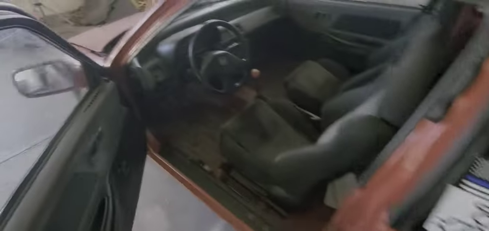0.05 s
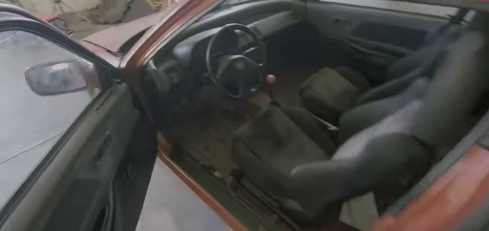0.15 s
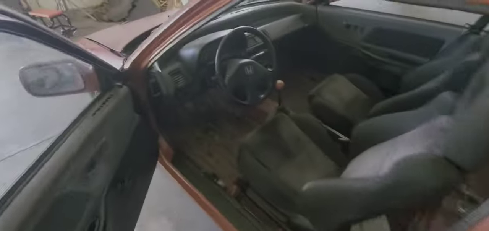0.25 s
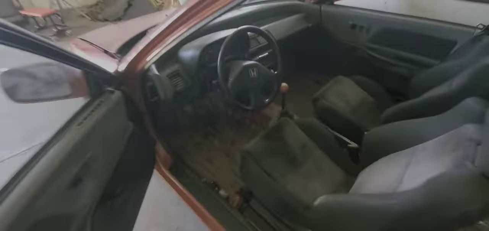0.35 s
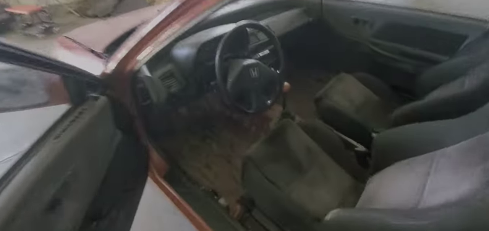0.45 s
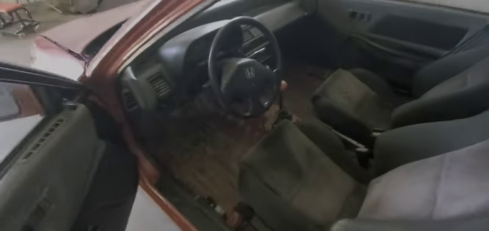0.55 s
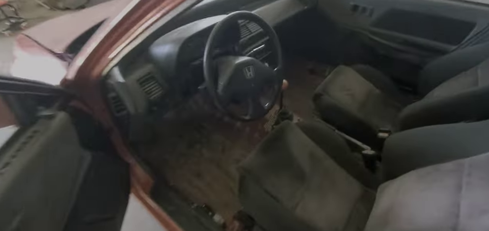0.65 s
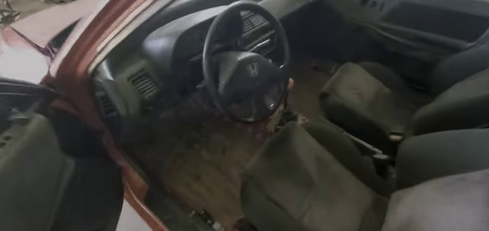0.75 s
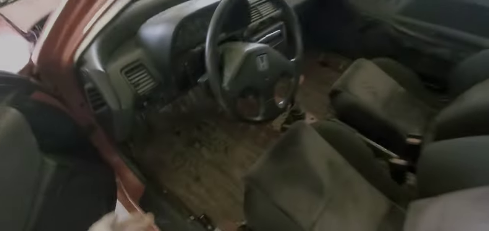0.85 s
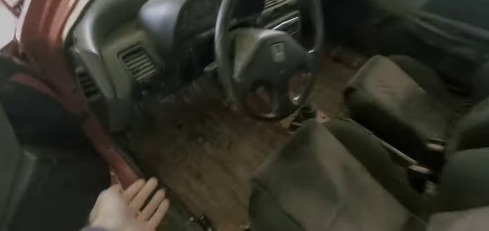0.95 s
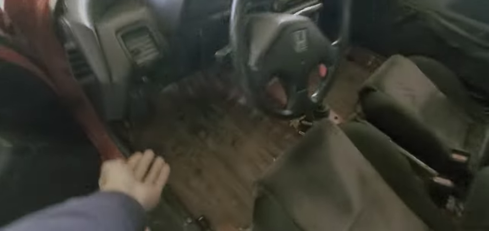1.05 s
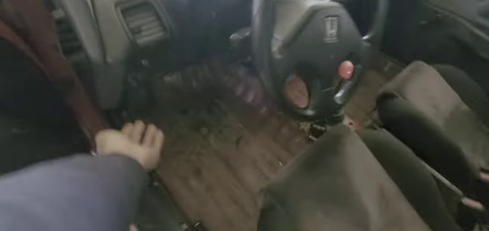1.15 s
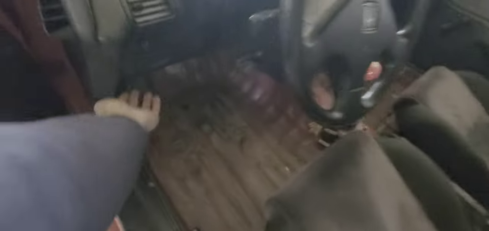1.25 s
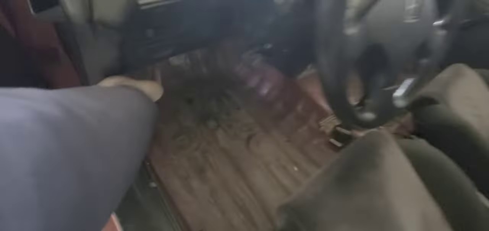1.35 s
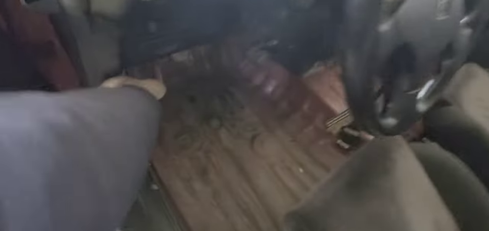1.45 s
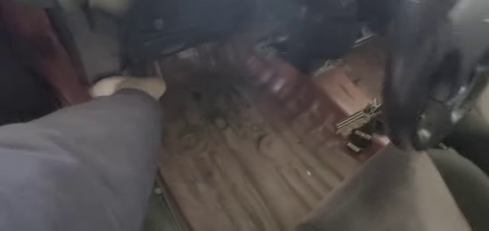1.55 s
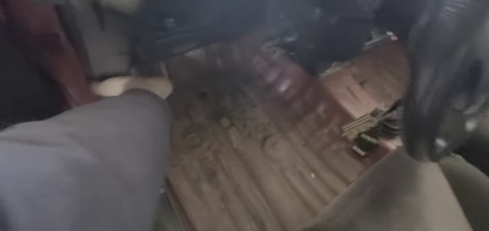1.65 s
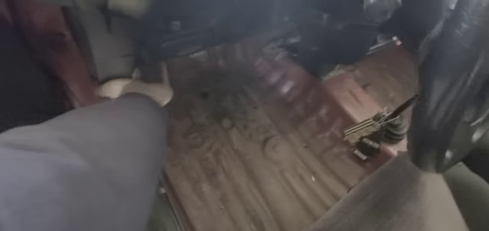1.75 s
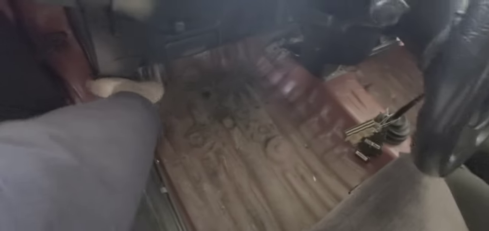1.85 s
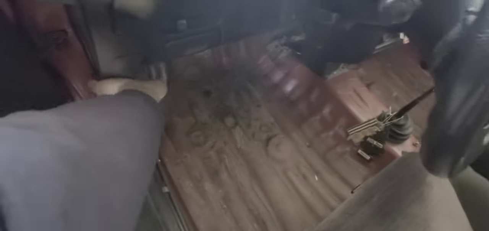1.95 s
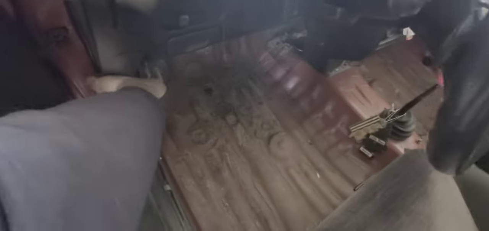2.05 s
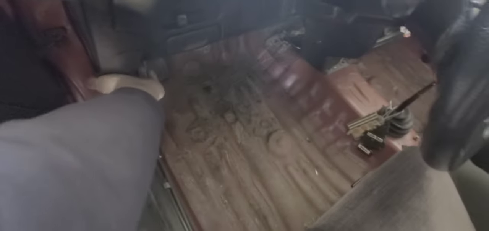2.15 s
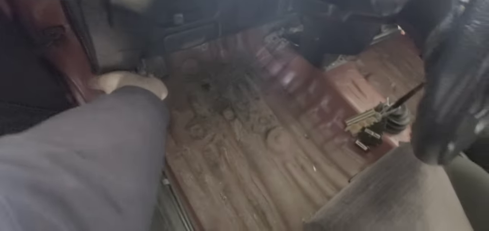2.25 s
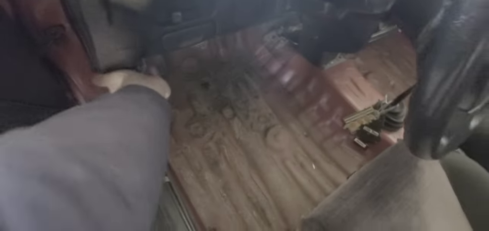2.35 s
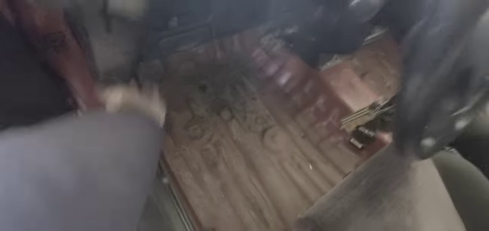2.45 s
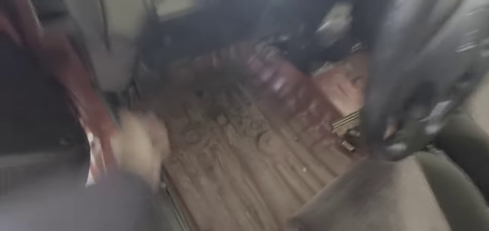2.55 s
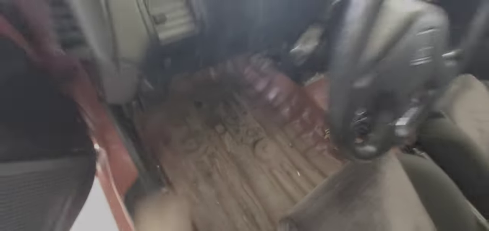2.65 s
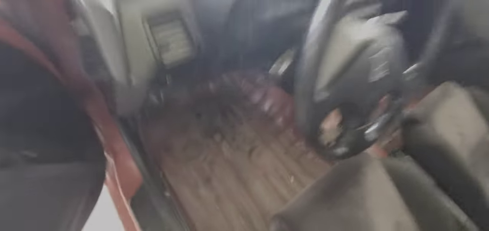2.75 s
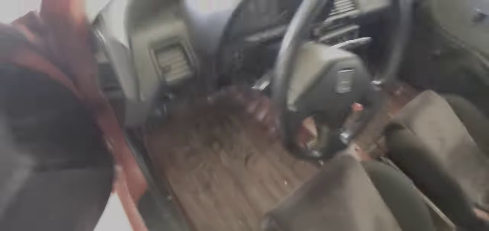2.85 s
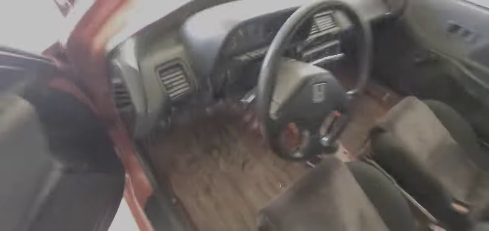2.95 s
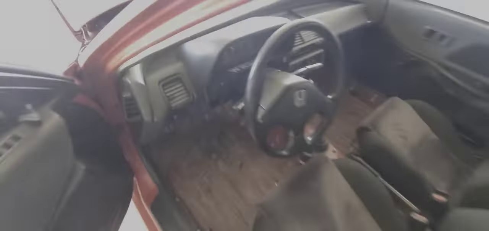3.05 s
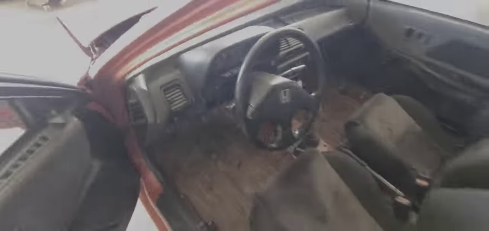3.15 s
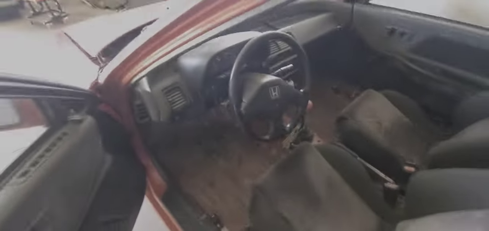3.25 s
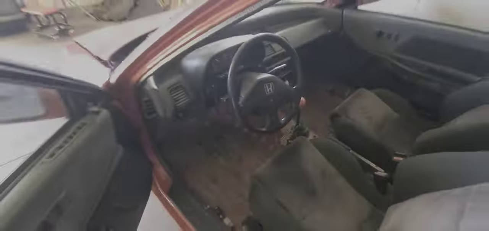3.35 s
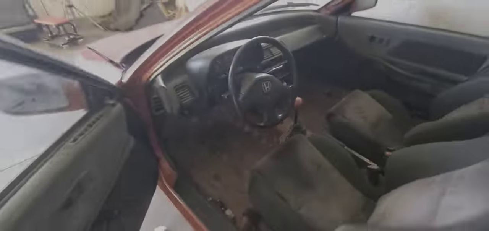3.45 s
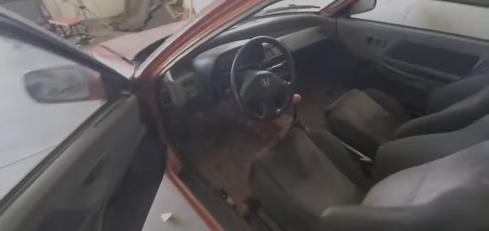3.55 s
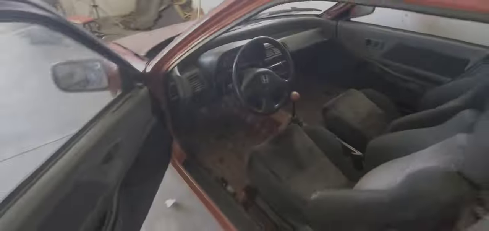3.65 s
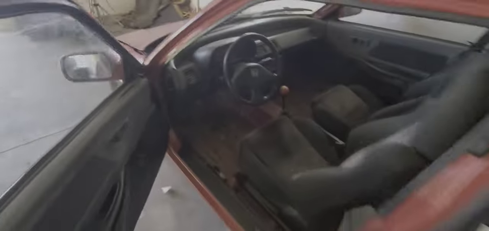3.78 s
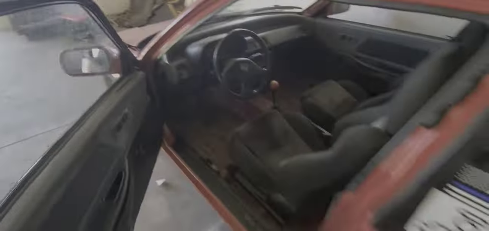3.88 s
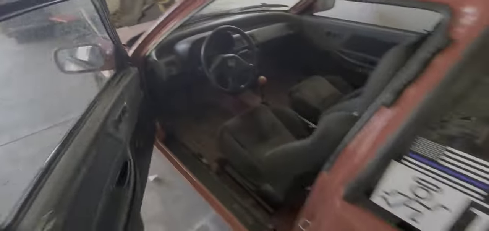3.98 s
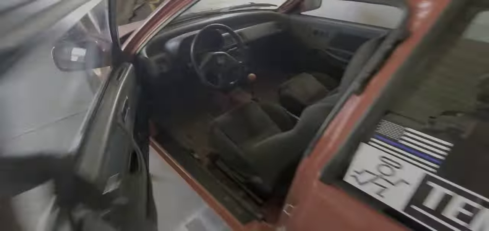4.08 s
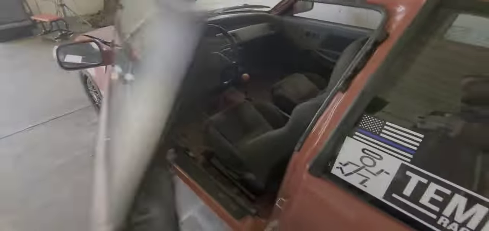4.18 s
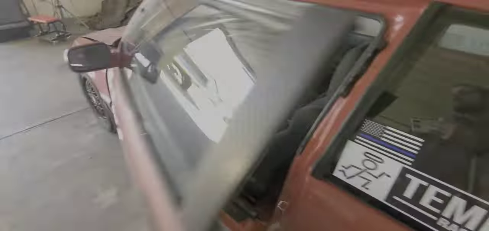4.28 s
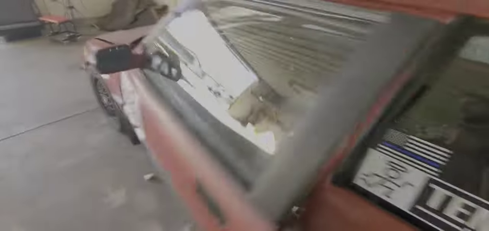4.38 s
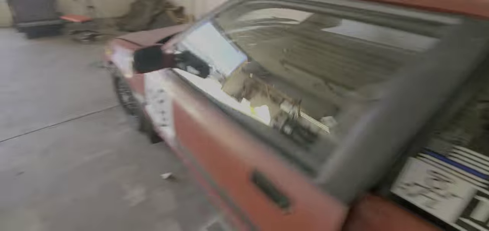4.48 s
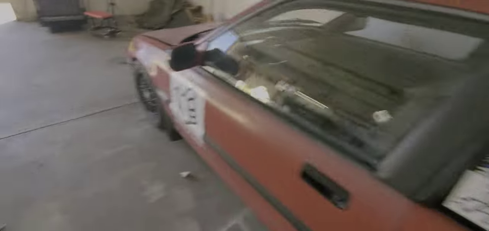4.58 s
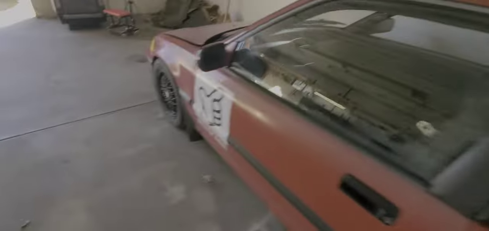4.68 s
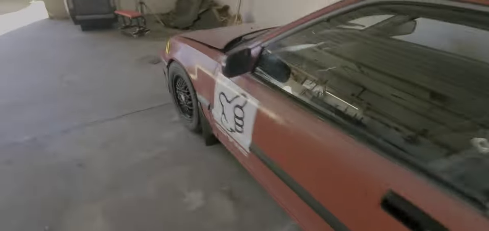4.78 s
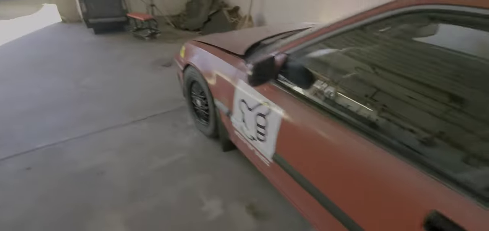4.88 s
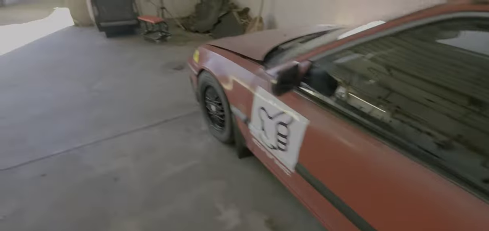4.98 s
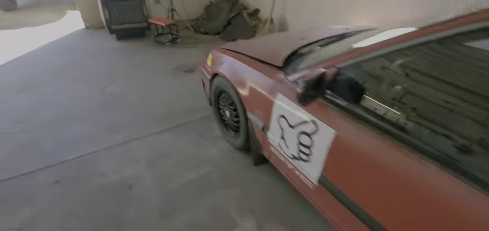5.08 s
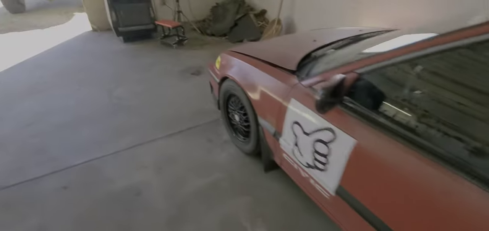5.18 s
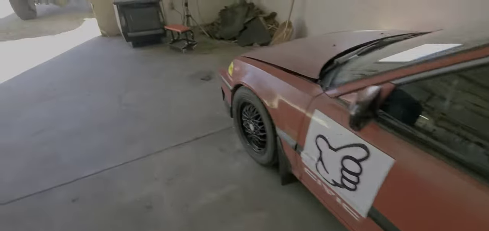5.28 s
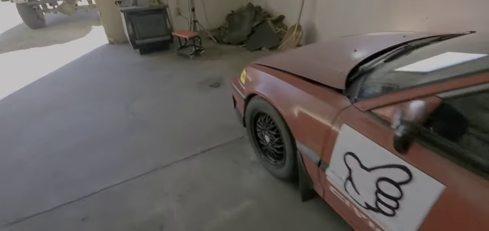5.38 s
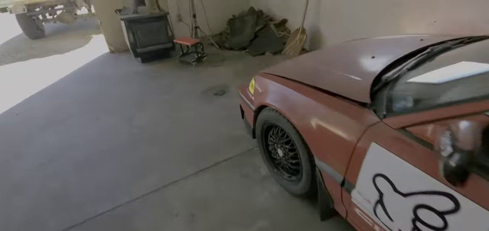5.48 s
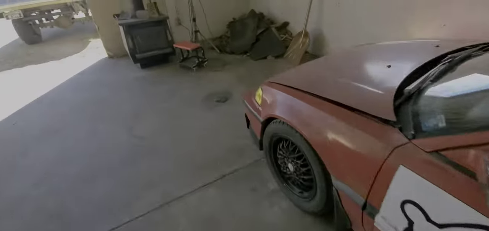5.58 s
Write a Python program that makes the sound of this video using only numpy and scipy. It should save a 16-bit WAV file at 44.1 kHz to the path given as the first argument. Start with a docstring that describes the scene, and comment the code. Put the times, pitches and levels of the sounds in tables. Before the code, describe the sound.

Over soft low garage noise, a person scuffs up to an open car and rustles into the footwell with light knocks and a creak. A sharp metallic latch release thumps, followed by a hard plastic clack. Shoes scrape away on concrete, and a weighty door slam rings and echoes. Stereo, close camera microphone; the cabin is drier than the floor.

```python
"""Hood release and door slam in a garage

Someone steps up to a small car, reaches under the dash and pulls the hood release: the latch pops,
the hood bounces on its spring, the plastic lever snaps back, shoes scuff away and the door is slammed.
Blows are low-passed by their contact time and excite dense resonances and single damped modes.
Rubbing is a random train of slips, creaks are gliding sines, and the background is shaped noise.
Each place has its own share of garage echo and its own image at two microphone ports."""
import sys
import numpy as np
from scipy import signal
from scipy.fft import rfft, irfft
from scipy.io import wavfile
from scipy.ndimage import uniform_filter1d, minimum_filter1d

SR = 44100
rng = np.random.default_rng(int(sys.argv[2]) if len(sys.argv) > 2 else 0)


def file_out(sig):
    """Save sig as 16-bit WAV at sys.argv[1]."""
    # one column per channel
    cols = np.atleast_2d(sig).T
    # limit, then scale
    lim = np.clip(cols, -1, 1)
    pcm = np.round(lim * 32767).astype(np.int16)
    wavfile.write(sys.argv[1], SR, pcm)


N = 248018
TIME = np.arange(N) / SR  # s
FREQ = np.maximum(np.fft.rfftfreq(N, 1 / SR), 1)  # Hz
TAIL = TIME[:SR * 3 // 2]  # s, time axis of every decay


def hood():
    """Release of stored energy: the latch lets go, its spring rasps, the hood booms in its lowest mode."""
    # latch blows before rebounds: start_s, level_db, contact_ms
    latch_blows = [(2.302, -0.5, 0.071), (2.344, 8, 3.8)]
    # dense resonances of the latch: centre_hz, level_db_per_octave, t60_s
    latch_body = [(40, -44.5, 0.43), (110, -44, 1), (207, -23.5, 0.13), (400, -30, 0.37),
                  (736, -41.5, 0.91), (1410, -36, 0.43), (3020, -33, 0.13), (4260, -39.5, 0.53),
                  (6200, -57, 0.2), (8900, -83, .2), (13200, -48.5, 0.35)]
    # single strong modes of the latch: pitch_hz, level_db, t60_s
    latch_modes = [(213.3, -24, 0.35), (493, -65, .3), (720, -31, .25), (1140, -34, 0.13),
                   (1276, -33.5, 0.55), (1723, -30.5, 0.084), (2660, -52.5, .39), (3644, -50, .55),
                   (4290, -43, 0.28)]
    # bobs of the freed hood on its spring: peak_s, level_db
    hood_bobs = [(2.359, -26.5), (2.43, -23.5)]
    # rasp of the latch spring: peak_s, length_s, level_db, tilt_db_per_octave, resonance_hz
    spring_rasp = [(2.315, .24, -41.5, 0.0057, 4200)]
    # relative spectrum of the rasp: frequency_hz, level_db
    rasp_colour = [(1500, -30), (2600, 4.5), (3500, 0.5), (4400, 4), (5100, -22), (8000, -40)]
    hood_hz, bob_rise_s, bob_fall_s = 68.1, 0.023, 0.07

    bobbing = sum(undb(db) * swell(s, bob_rise_s, bob_fall_s) for s, db in hood_bobs)
    since_release = TIME - latch_blows[0][0]
    boom = bobbing * np.sqrt(2) * np.sin(2 * np.pi * hood_hz * since_release)
    rasp = friction(spring_rasp, rasp_colour, slips_per_s=1300, judder_db=1.0, rise_share=0.09, ring_db=0)
    blows = rebounds(latch_blows, count=3, gap_s=0.0075, loss_db=0.4, softening=2.0)
    return boom + rasp + strike(blows, latch_body, latch_modes, attack_s=0.0005)


def lever():
    """Impact with rebound: the plastic release lever snaps back and excites its damped modes."""
    # lever blows before rebounds: start_s, level_db, contact_ms
    lever_blows = [(2.5075, 1, 0.085), (2.611, -17, 0.98)]
    # dense resonances of the lever: centre_hz, level_db_per_octave, t60_s
    lever_body = [(40, -40.5, 0.13), (120, -40, 0.22), (268, -19, 0.16), (500, -27, 0.16), (830, -29, 0.22),
                  (1250, -17.5, 0.045), (2660, -17.5, 0.039), (4500, -34, 0.11), (7000, -37.5, .09),
                  (9000, -68, .09), (12500, -29, 0.064)]
    # single strong modes of the lever: pitch_hz, level_db, t60_s
    lever_modes = [(220, -33.5, 0.58), (311, -20.5, 0.13), (486, -6, 0.039), (704, -41, 0.53),
                   (1202, -13, 0.069), (1790, -31.5, 0.13), (1997, -35.5, 0.076), (2656, -34, 0.16)]
    blows = rebounds(lever_blows, count=2, gap_s=0.018, loss_db=5.5, softening=2.4)
    return strike(blows, lever_body, lever_modes, attack_s=0.00048)


def door():
    """Panel impact: the slam and its rebounds excite the low modes and dense resonances of the door."""
    # door blows before rebounds: start_s, level_db, contact_ms
    door_blows = [(4.626, 4, 0.17), (4.733, -4, 0.2)]
    # dense resonances of the door: centre_hz, level_db_per_octave, t60_s
    door_body = [(30, -19, 0.62), (70, -14.5, 0.69), (124, -25, 0.65), (197, -19, 0.48), (365, -17, 0.32),
                 (620, -27, 0.63), (980, -38, 0.82), (1600, -31.5, 0.46), (2680, -42.5, 0.76),
                 (5350, -37.5, 0.37), (9130, -60, 0.58), (13000, -49.5, 0.82)]
    # single strong modes of the door: pitch_hz, level_db, t60_s
    door_modes = [(31, -22, 0.29), (43.6, -23.5, 0.39), (72.1, -13.5, 0.74), (94.3, -20, 0.74),
                  (128.2, -17.5, 0.75), (275.4, -21, 0.78), (322.6, -36.5, 0.33), (372.2, -17.5, 0.29),
                  (420, -27, .4), (508, -28.5, 0.37), (589, -29, 0.29), (612, -35, 0.51),
                  (741, -34.5, 0.56), (1172, -41, 0.83), (1263, -36.5, 0.56), (1582, -49.5, 0.55)]
    blows = rebounds(door_blows, count=4, gap_s=0.023, loss_db=6.5, softening=1.7)
    return strike(blows, door_body, door_modes, attack_s=0.0014)


def rattle():
    """Random micro-contacts: glass and lock rods shake inside the door."""
    # bursts of rattling: peak_s, length_s, level_db, tilt_db_per_octave, resonance_hz
    door_rattle = [(4.643, 0.067, -22, -1.7, 1656), (4.735, .165, -34.5, 1, 1240)]
    # relative spectrum of the rattling: frequency_hz, level_db
    rattle_colour = [(400, -35), (800, 3), (1300, -6), (1900, -7.5), (3200, -12), (5000, -37.5),
                     (8500, -52)]
    return friction(door_rattle, rattle_colour, slips_per_s=390, judder_db=4.5, rise_share=0.39, ring_db=7)


def shoes():
    """Dry sliding friction: shoes scuff over the concrete."""
    # scuffs: peak_s, length_s, level_db, tilt_db_per_octave, resonance_hz
    shoe_scuffs = [(.809, 0.053, -37, 0.5, 880), (.853, 0.057, -37, 1, 880),
                   (3.521, 0.06, -36.5, -1.5, 2040), (3.578, 0.085, -40, -0.5, 2700),
                   (3.614, 0.092, -34, -0.5, 1710), (3.745, 0.024, -50.5, 3, 2100),
                   (3.901, 0.088, -50.5, 1.5, 593), (3.938, 0.19, -43.5, -1.5, 574),
                   (5.48, 0.14, -60.5, -1, 1500)]
    # relative spectrum of the scuffs: frequency_hz, level_db
    shoe_colour = [(260, -36), (450, -15.5), (614, -12), (814, -5.5), (1050, -15.5), (1130, -10),
                   (1450, -13.5), (1840, -13), (2700, -9.5), (3270, -18), (5750, -31), (6280, -35),
                   (7280, -40), (8450, -67), (15500, -44)]
    return friction(shoe_scuffs, shoe_colour, slips_per_s=2800, judder_db=1.0, rise_share=0.23, ring_db=10)


def knocks():
    """Light impacts: small knocks on trim and floor, heavily damped."""
    # knocks: start_s, level_db, contact_ms
    trim_knocks = [(1.184, -7, 0.064), (1.752, 0, 0.38), (1.787, 17.5, 4.1), (1.903, -0.5, .65),
                   (2.689, 13.5, 0.83), (3.354, 11.5, 1.57), (3.392, 0, 0.7), (4.168, 2, 0.71)]
    # dense resonances of the trim: centre_hz, level_db_per_octave, t60_s
    trim_body = [(90, -76, 0.14), (240, -38, 0.063), (460, -47.5, 0.059), (800, -39.5, 0.011),
                 (1400, -43, 0.14), (2720, -44, 0.21), (5030, -55.5, 0.089), (9000, -77.5, .05)]
    return strike(trim_knocks, trim_body, [], attack_s=0.00054)


def sleeve():
    """Fibre friction: a sleeve rubs in short strokes."""
    # rubs: peak_s, length_s, level_db, tilt_db_per_octave, resonance_hz
    sleeve_rubs = [(.70, 0.21, -53, -1.5, 2920), (.985, 0.037, -50.5, -5, 2200),
                   (1.143, 0.062, -38.5, -.5, 1816), (1.352, 0.068, -49.5, 4.5, 2530),
                   (1.415, 0.19, -39, -1, 3804), (1.55, 0.14, -56, 5.5, 4100),
                   (1.913, 0.1, -53.5, 2.5, 2900), (2.937, 0.087, -51.5, -4.5, 2310),
                   (4.202, 0.098, -48.5, -3, 2870), (5.06, 0.099, -52, -.5, 2800)]
    # relative spectrum of the rubs: frequency_hz, level_db
    sleeve_colour = [(120, -29.5), (200, -2), (407, -5), (906, -12.5), (1210, -13), (1540, -13),
                     (1810, -12), (2290, -7), (3750, -8.5), (6590, -19.5), (8050, -42.5), (12500, -34),
                     (15500, -39.5)]
    return friction(sleeve_rubs, sleeve_colour, slips_per_s=2400, judder_db=2.26, rise_share=0.3, ring_db=9.5)


def creaks(waver=0.037, chatter_db=4):
    """Stick-slip: trim and release cable squeak roughly on an unsteady, gliding pitch."""
    # creaks: start_s, length_s, first_hz, last_hz, level_db
    creak_glides = [(1.3, 0.042, 1820, 1950, -55), (1.382, 0.095, 1268, 1140, -40),
                    (2.632, .2, 1338, 1554, -50)]
    out = 0
    for s, length, first_hz, last_hz, db in creak_glides:
        progress = np.clip((TIME - s) / length, 0, 1)
        hz = (first_hz + (last_hz - first_hz) * progress) * (1 + waver * wander(584))
        grip = np.sin(np.pi * progress) * undb(db + chatter_db * wander(270))
        out = out + grip * np.sin(2 * np.pi * np.cumsum(hz) / SR)
    return out


def ticks(attack_s=0.00017, t60_s=0.049):
    """One-mode response: small contacts tick, each with one short ring: trim, a catching sleeve, a heel landing."""
    # ticks: start_s, level_db, pitch_hz
    small_contacts = [(1.136, -37.5, 3510), (1.285, -47, 1720), (1.341, -44, 2470), (1.483, -39.5, 2740),
                      (1.75, -38.5, 2550), (2.672, -32.5, 1306), (3.51, -43.5, 2746), (3.569, -32.5, 820),
                      (5.309, -56.5, 3380)]
    out = np.zeros((2, N + len(TAIL)))
    onset = (1 - np.exp(-TAIL / attack_s)) ** 2
    for s, db, hz in small_contacts:
        start = int(s * SR)
        out[:, start:start + len(TAIL)] += ring([(hz, db, t60_s)]) * onset
    return out[:, :N]


def air(level_db=-48, rumble_db=-45.5, flutter_db=1.06, rumble_hz=110):
    """Shaped noise: the garage background, stirred by movement, over a rumble with swells of its own."""
    # relative spectrum of the background: frequency_hz, level_db_per_hz
    air_spectrum = [(12, -49.5), (20, -7.5), (70, -0.5), (153, -11), (191, -14.5), (219, -11.5), (324, -14),
                    (452, -20), (519, -18.5), (906, -28.5), (1040, -28.5), (2150, -39.5), (3350, -47),
                    (8170, -70), (15500, -60)]
    # the background is louder while someone moves about: peak_s, length_s, rise_db
    stirs = [(.55, 1, 3), (3.4, 1, 3), (4.15, .55, 4)]
    # swells of the rumble: peak_s, length_s, rise_db
    rumble_swells = [(.42, 0.26, 7.5), (4.42, .32, 4)]
    # a wash dies away at the start, raising the rumble by half as many dB
    wash_db = 13.5 * np.exp(-TIME / 0.073)

    noise = shape(rng.standard_normal((2, N)), undb(lookup(air_spectrum, FREQ)[0]))
    bass = irfft(rfft(noise) / (1 + (FREQ / rumble_hz) ** 4), N)
    upper = (noise - bass) * undb(level_db + humps(stirs) + wash_db)
    rumble = bass * undb(rumble_db + humps(rumble_swells) + wash_db / 2)
    return (upper + rumble) * undb(flutter_db * wander(13))


def rebounds(blows, count, gap_s, loss_db, softening, scatter=0.059):
    """Energy loss on bouncing: count landings at uneven gaps, each weaker and longer in contact."""
    landings = []
    for s, db, contact_ms in blows:
        for k in range(count):
            delay = k * gap_s * (1 + scatter * rng.standard_normal())
            landings.append((s + delay, db - k * loss_db, contact_ms * softening ** k))
    return landings


def strike(blows, body, modes, attack_s):
    """Contact-time filtering: each blow lands on a new spot, and a longer contact sounds duller."""
    out = np.zeros((2, N + len(TAIL)))
    rings = ring(modes)
    for s, db, contact_ms in blows:
        response = (crowd(body) + rings) * (1 - np.exp(-TAIL / attack_s))
        # two equal one-pole low-passes with their corner at 500 / contact_ms Hz
        keep = np.exp(-1000 * np.pi / (contact_ms * SR))
        hit = signal.lfilter([(1 - keep) ** 2], np.poly([keep, keep]), response)
        start = int(s * SR)
        out[:, start:start + len(TAIL)] += undb(db) * hit
    return irfft(rfft(out[:, :N]) * ripple(width_hz=36.5, depth_db=2.5), N)


def crowd(body):
    """High modal density: close resonances act as half-octave-spaced noise bands, each with its own decay."""
    noise = rfft(rng.standard_normal((2, len(TAIL))))
    hz = np.fft.rfftfreq(len(TAIL), 1 / SR) + 1
    out = 0
    for centre in 25 * 2 ** np.arange(0, 10, 0.5):
        octaves = np.clip(np.log2(hz / centre), -0.5, 0.5)
        band = irfft(noise * np.cos(np.pi * octaves), len(TAIL))
        db, t60 = lookup(body, centre)
        decay = undb(db - 60 * TAIL / t60)
        out = out + band / band.std() * decay * np.sqrt(0.5)  # two bands share an octave
    return out


def ring(modes):
    """Modal decay: damped sines, each reaching the second channel in a phase of its own."""
    out = np.zeros((2, len(TAIL)))
    for hz, db, t60 in modes:
        phase = np.array([[0], [rng.uniform(0, 2 * np.pi)]])
        out += undb(db - 60 * TAIL / t60) * np.sin(2 * np.pi * hz * TAIL + phase)
    return out


def friction(strokes, colour, slips_per_s, judder_db, rise_share, ring_db):
    """Stick-slip swarm: each stroke's slips swell, ring what they rub on and die away."""
    # the contact keeps sliding between two spots that ring differently
    spot = np.pi / 2 * wander(45)
    grains = 0
    for share in (np.cos(spot), np.sin(spot)):
        grains = grains + shape(slips(slips_per_s) * share, ripple(width_hz=110, depth_db=4))
    (colour_db,) = lookup(colour, FREQ)
    out = 0
    for s, length, db, tilt_db, resonance_hz in strokes:
        resonance_db = ring_db / (1 + ((FREQ - resonance_hz) / 130) ** 2)
        rub = shape(grains, undb(colour_db + tilt_db * np.log2(FREQ) + resonance_db))
        out = out + rub * undb(db) * swell(s, length * rise_share, length * (1 - rise_share))
    return out * undb(judder_db * wander(47))


def slips(per_s):
    """Shot noise: a random train of tiny slips of unequal size and either sign."""
    sizes = undb(3 * np.minimum(rng.exponential(size=N), 3))
    happens = rng.random(N) < per_s / SR
    return happens * sizes * rng.choice([-1, 1], (2, N))


def ripple(width_hz, depth_db):
    """Interference by small parts: chance peaks and notches, at full depth only well above 900 Hz."""
    size = int(width_hz * N / SR)
    walk = uniform_filter1d(uniform_filter1d(rng.standard_normal(len(FREQ)), size), size)
    return undb(depth_db * walk / walk.std() * FREQ / (FREQ + 900))


def wander(rate):
    """Low-passed noise: a smooth random fluctuation with a spread of 1, averaged twice over 1 / rate s."""
    size = int(SR / rate)
    walk = uniform_filter1d(uniform_filter1d(rng.standard_normal(N), size), size)
    return walk / walk.std()


def swell(s, rise, fall):
    """Envelope: a gain peaking at s, 20 dB down one rise time before and one fall time after."""
    before = ((s - TIME) / rise) ** 2
    after = (np.abs(TIME - s) / fall) ** 1.29
    return undb(-20 * np.where(TIME < s, before, after))


def humps(table):
    """Slow modulation: bell-shaped rises of level, in dB."""
    return sum(db * np.exp(-(2 * (TIME - s) / length) ** 2) for s, length, db in table)


def shape(x, gain):
    """Linear filtering: give a sound this spectrum, at rms 1."""
    y = irfft(rfft(x) * gain, N)
    return y / y.std()


def lookup(table, hz):
    """Interpolation on a logarithmic frequency axis: a table's columns at these frequencies."""
    points, *columns = np.transpose(table)
    return [np.interp(np.log(hz), np.log(points), c) for c in columns]


def undb(db):
    """Logarithmic level: decibels to amplitude gain."""
    return 10 ** (np.asarray(db) / 20)


def convolve(x, response):
    """Superposition: send a sound through a two-channel impulse response."""
    return signal.fftconvolve(np.atleast_2d(x), response, axes=1)[:, :N]


def garage(x, wet_db):
    """Reverberation: add the wash from the bare walls, which builds up after the direct sound."""
    # echo, later scaled to unit energy: centre_hz, relative_level_db_per_octave, t60_s
    echo_body = [(60, -21.5, 0.96), (254, -11, 0.66), (1010, -6, 0.8), (4040, 1, 0.55), (12000, 5.5, 0.58)]
    echo = crowd(echo_body) * np.clip(TAIL / 0.039, 0, 1)
    return x + undb(wet_db) * convolve(x, echo / np.sqrt(np.sum(echo[0] ** 2)))


def ports(x, side, diffuse):
    """Spatial coherence: two ports differ in phase and level; diffuse sound is less alike above the bass."""
    # ports, before side and diffuse act:
    # frequency_hz, right_minus_left_db, right_lead_rad, likeness (0-1)
    port_pair = [(39.8, -6, 0.069, 1), (119, 3.7, 0.27, 0.98), (206, -2, 0.55, 1), (326, 9.5, 0.44, 0.19),
                 (680, 6, 4.72, 0.57), (1400, 8.5, 3.67, 0.72), (2800, 16, 4.32, 0.75), (6200, 19, 5, 1)]
    right_db, lead, likeness = lookup(port_pair, FREQ)
    likeness = np.clip(likeness - diffuse * FREQ / (FREQ + 150), 0, 1)
    right_gain = undb(side * right_db)
    left, other = rfft(x)
    shared = likeness * np.exp(1j * lead) * left
    right = right_gain * (shared + np.sqrt(1 - likeness ** 2) * other)
    # dividing by this keeps the sum of the ports flat
    centre = np.sqrt(1 + right_gain ** 2 + 2 * right_gain * likeness * np.cos(lead)) / 2
    return irfft(np.array([left, right]) / centre, N)


def scene():
    """Direct-to-reverberant ratio: cabin sounds stay drier than those out on the garage floor."""
    bonnet = ports(garage(hood(), wet_db=-14), side=0.6, diffuse=0.2)
    footwell = ports(garage(lever(), wet_db=-22), side=0.58, diffuse=0.081)
    slam = ports(garage(door() + rattle(), wet_db=-13.5), side=0.5, diffuse=0.024)
    floor = ports(garage(shoes(), wet_db=-15.5), side=0.65, diffuse=0.1)
    small_sounds = knocks() + sleeve() + creaks() + ticks()
    cabin = ports(garage(small_sounds, wet_db=-21), side=0.89, diffuse=0.12)
    background = ports(air(), side=0.59, diffuse=0.36)
    return bonnet + footwell + slam + floor + cabin + background


def record(dry):
    """Peak limiting and band limiting: the camera's limiter holds the loudest peaks, and the top is cut."""
    ceiling, top_hz = 0.95, 15850
    gain = ceiling / np.maximum(np.abs(dry).max(axis=0), ceiling)
    gain = uniform_filter1d(minimum_filter1d(gain, size=500), size=250)
    low_pass = signal.ellip(10, 0.1, 70, top_hz, fs=SR, output="sos")
    return signal.sosfilt(low_pass, dry * gain)


dry = scene()
out = record(dry)
file_out(out)
```